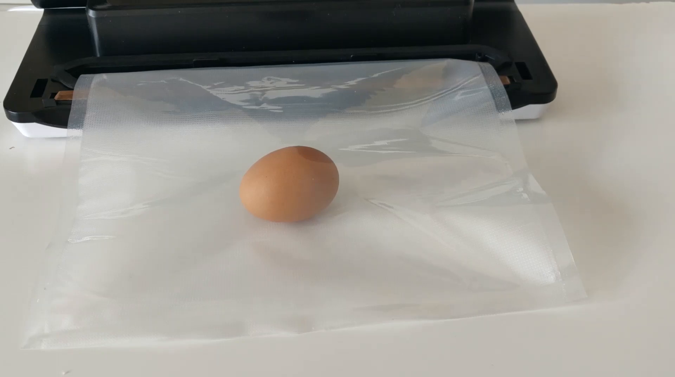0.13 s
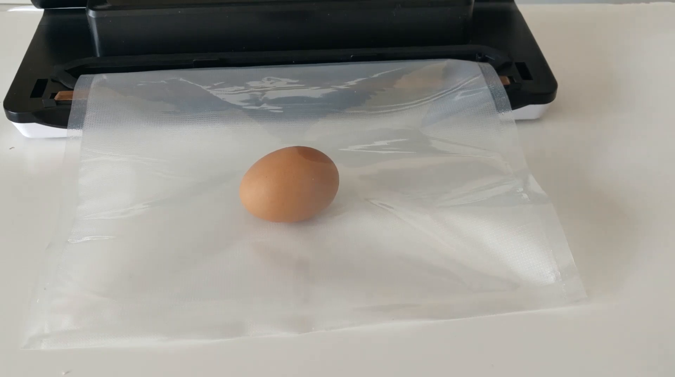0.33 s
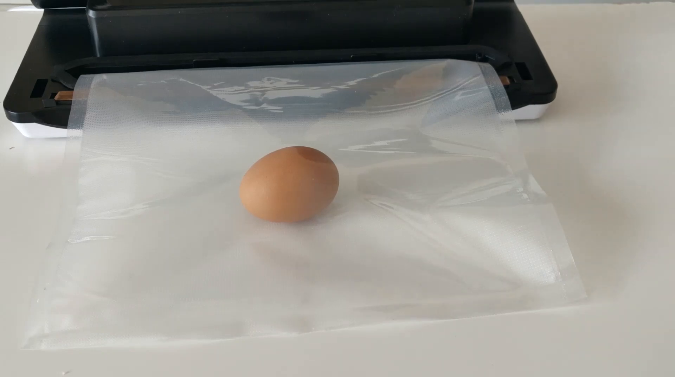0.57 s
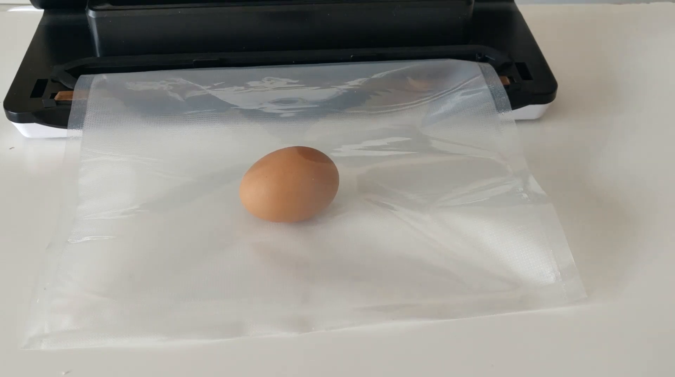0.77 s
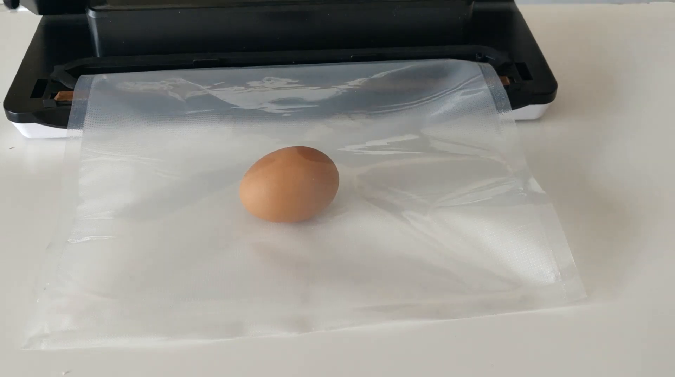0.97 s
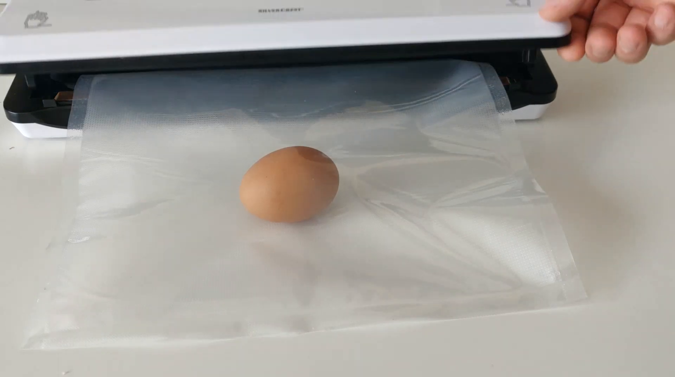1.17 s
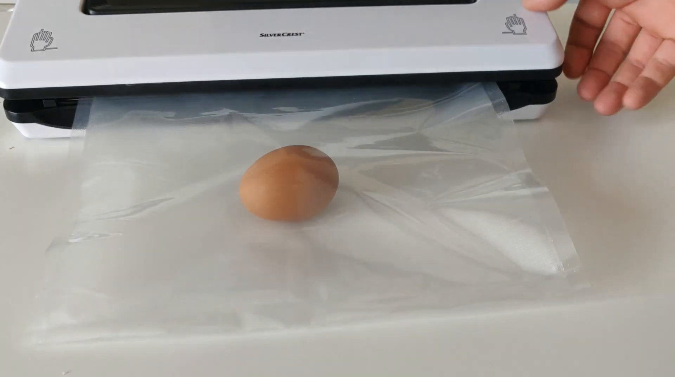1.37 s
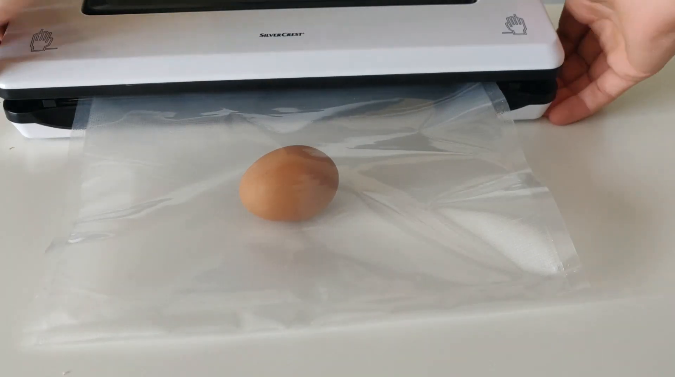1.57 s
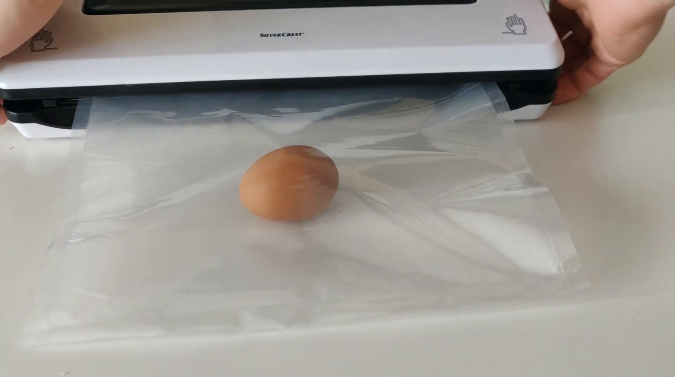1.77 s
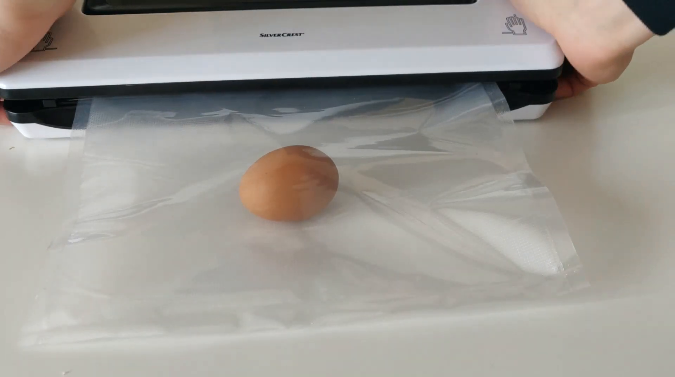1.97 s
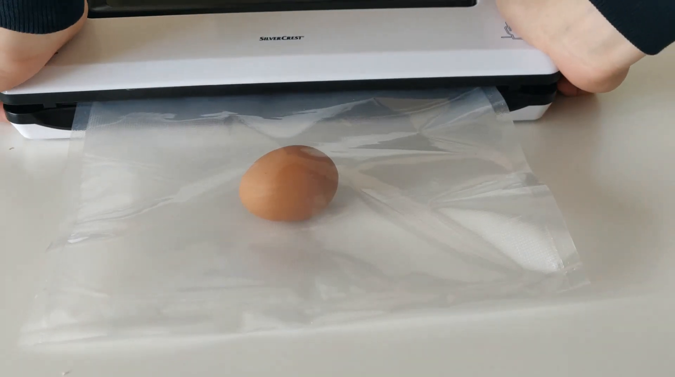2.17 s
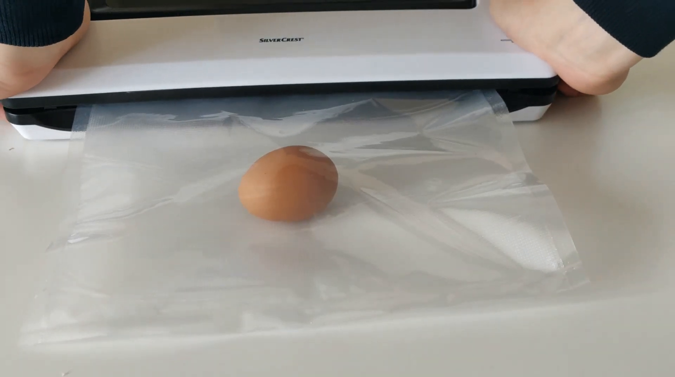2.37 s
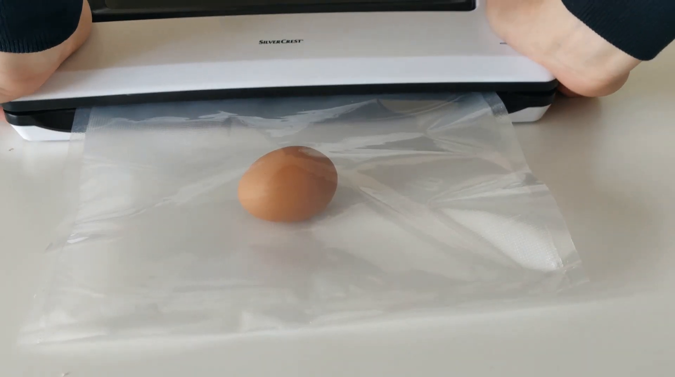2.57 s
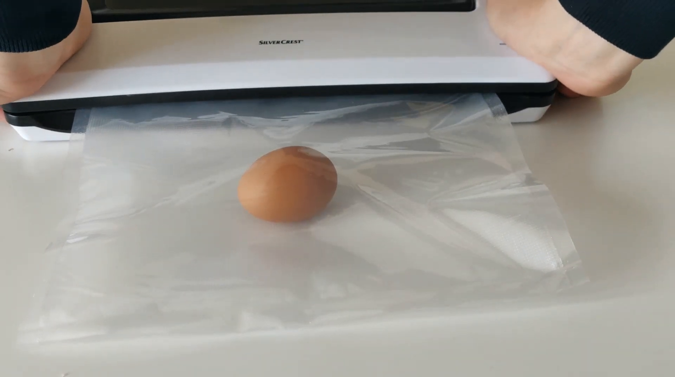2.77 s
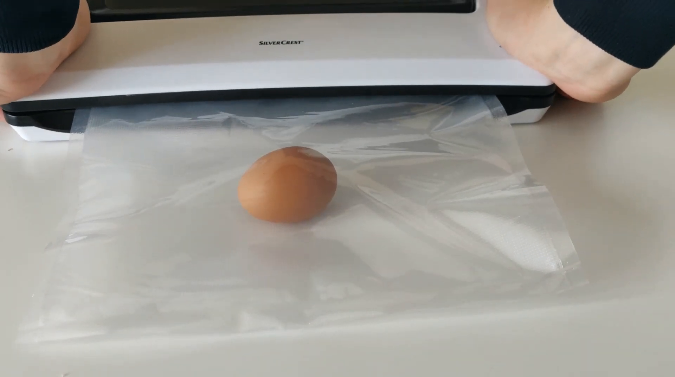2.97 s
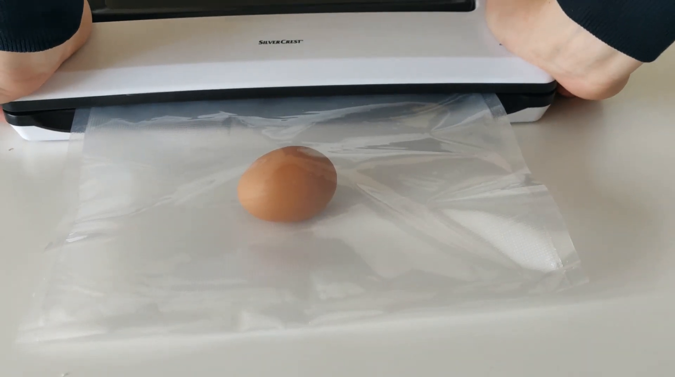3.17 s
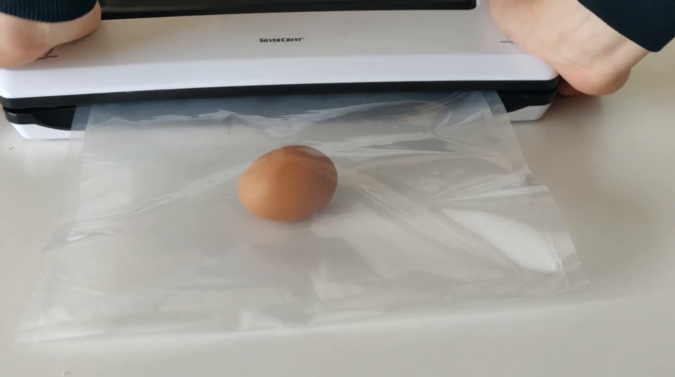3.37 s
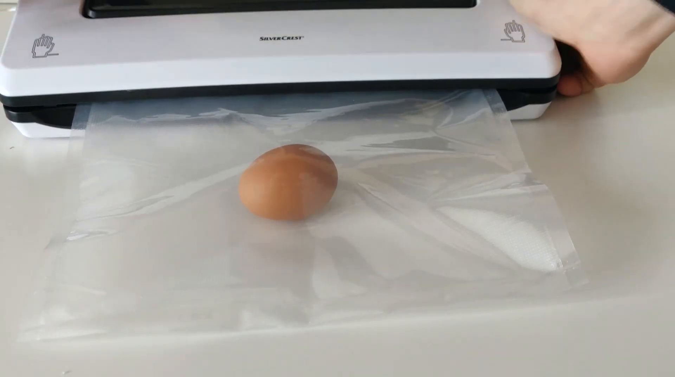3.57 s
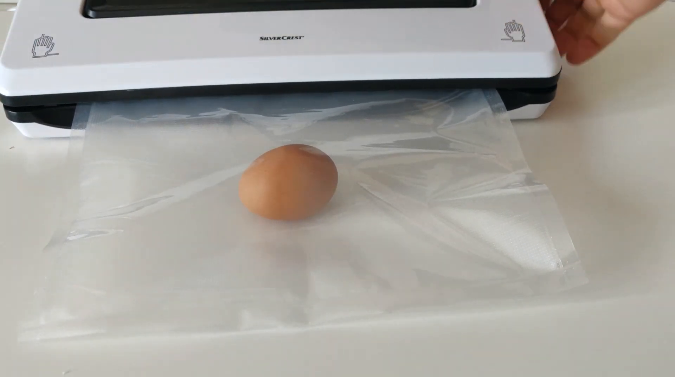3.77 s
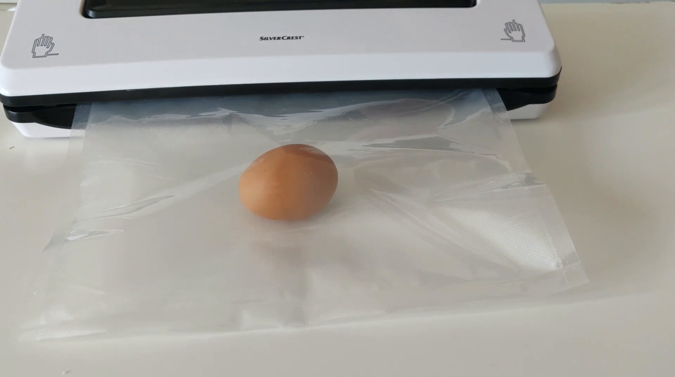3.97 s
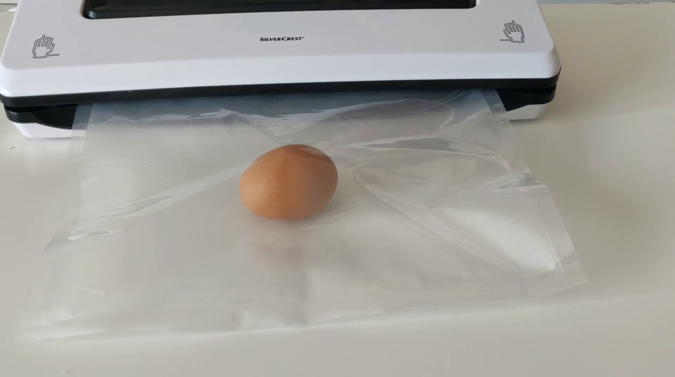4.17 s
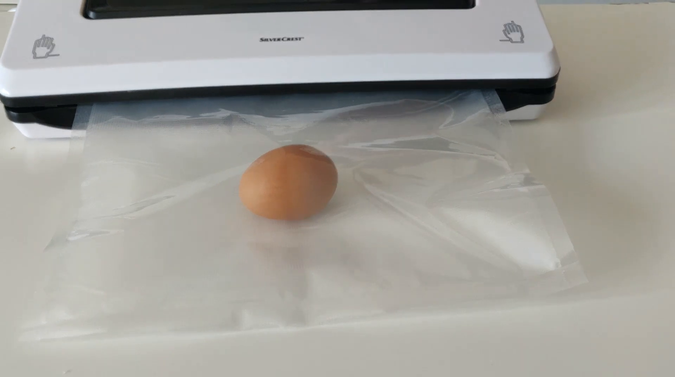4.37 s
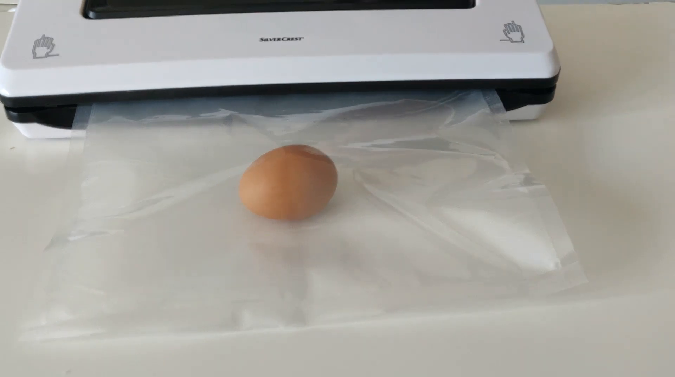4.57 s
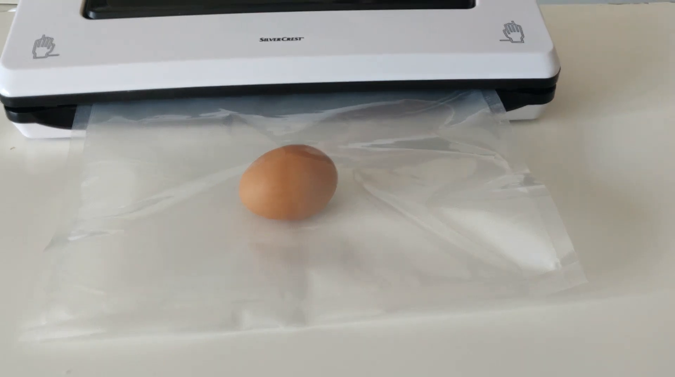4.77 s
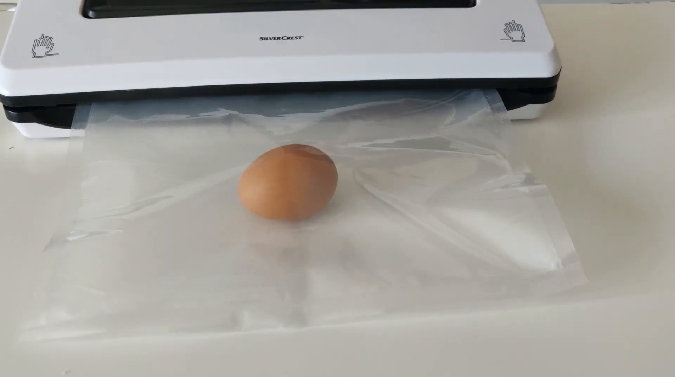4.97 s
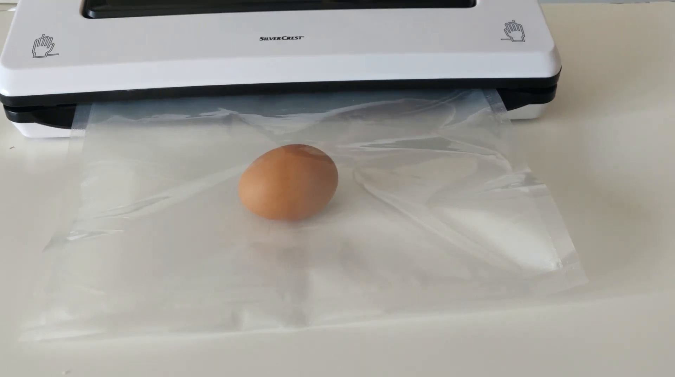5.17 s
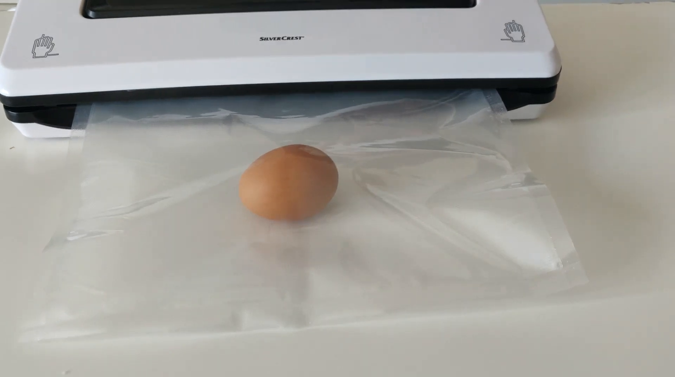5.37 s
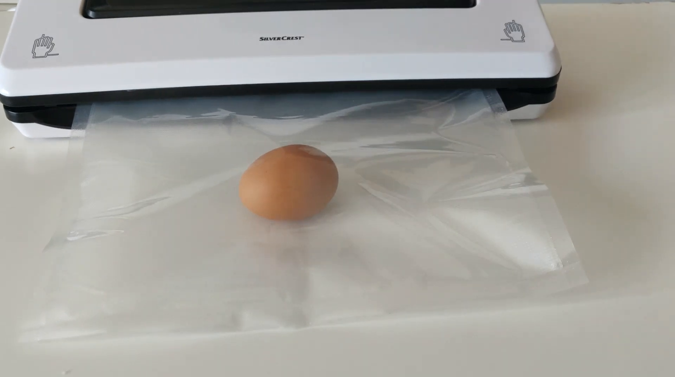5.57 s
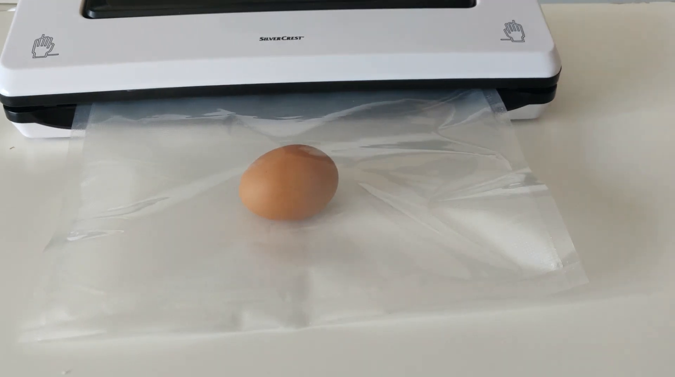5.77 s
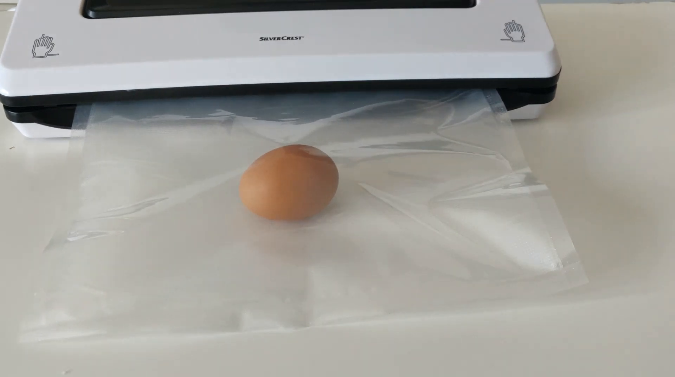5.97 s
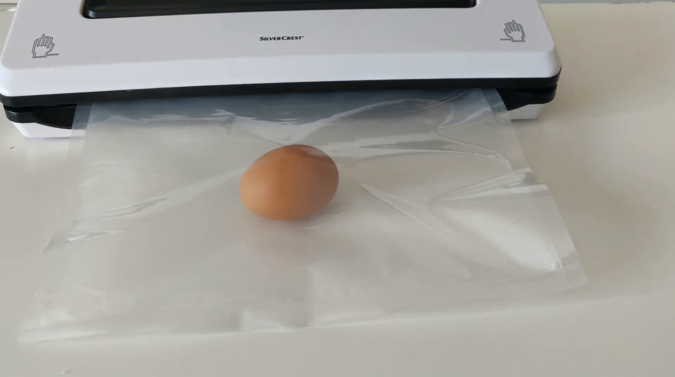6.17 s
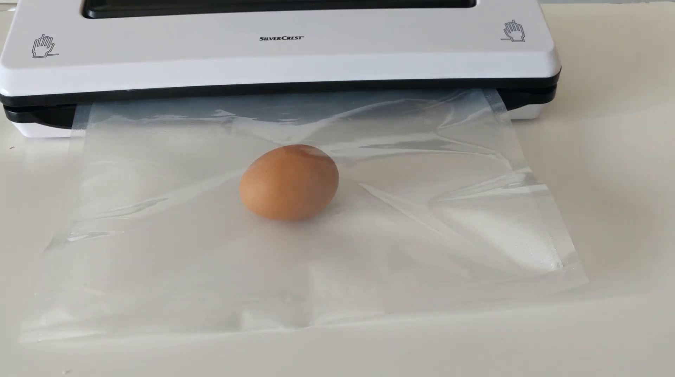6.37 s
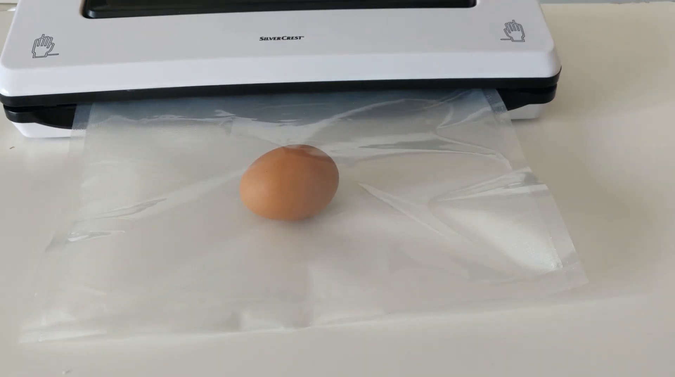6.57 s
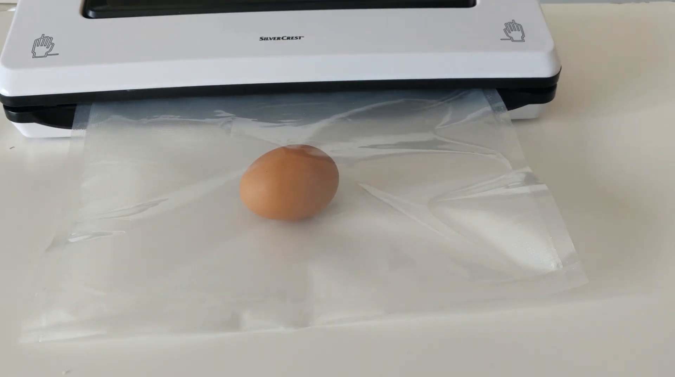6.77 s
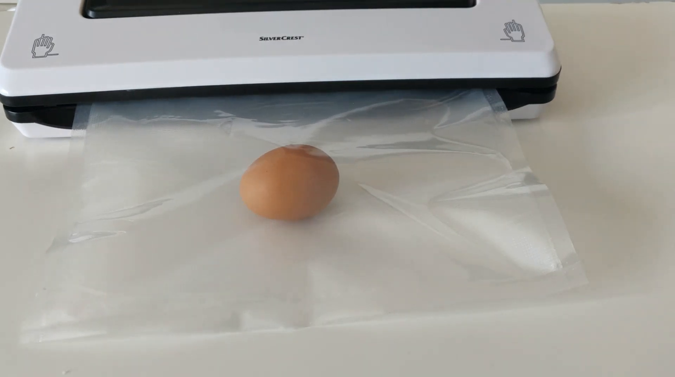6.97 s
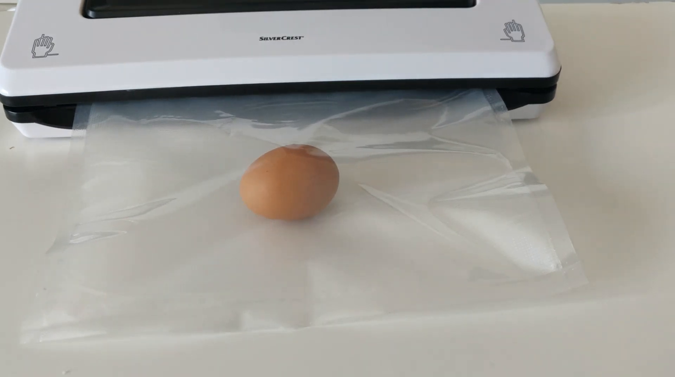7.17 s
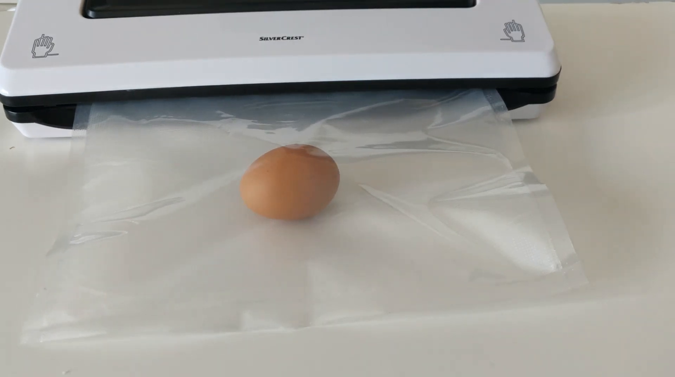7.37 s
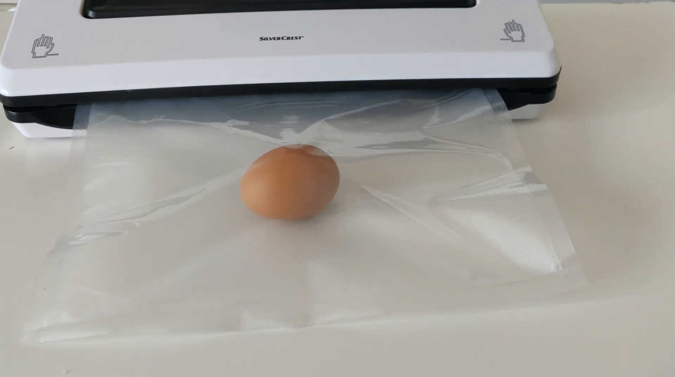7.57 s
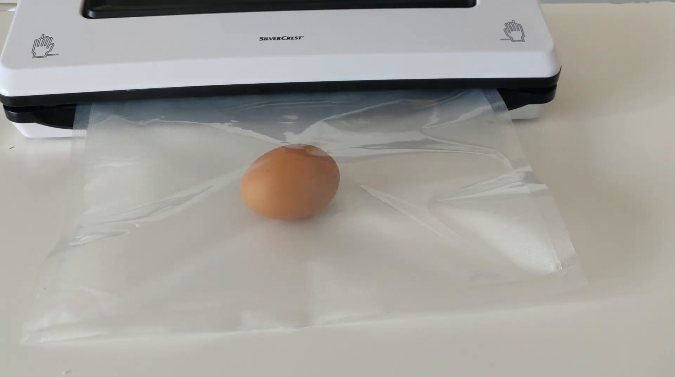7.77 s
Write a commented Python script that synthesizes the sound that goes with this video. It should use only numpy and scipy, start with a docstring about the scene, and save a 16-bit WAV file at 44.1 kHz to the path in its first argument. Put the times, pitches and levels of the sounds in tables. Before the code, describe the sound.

Close stereo microphones in a small kitchen. Soft rubbing and film rustle lead to hollow plastic knocks and a clattering lid landing. A low creak under pressure ends in two very loud, sharp latch snaps. Quiet room tone follows with a few faint touches, then a switch clicks and a piston pump starts with airy puffing, soon turning into a harder, buzzing hum.

```python
"""A lid is lowered amid rubbing hands and rustling film, pressed down, and latches with two loud snaps.
A switch clicks and a kitchen vacuum sealer's piston pump starts, puffing, then humming harder as the bag empties.
Blows are decaying housing modes with noise clatter and snaps; hands, film and air are coloured noise;
hum and whine are multiples of the shaft rate. A small room answers the blows, film ticks and switches,
and two close microphone ports add their own resonances."""
import sys
import numpy as np
from scipy import signal
from scipy.fft import rfft, irfft
from scipy.io import wavfile

SR = 44100
rng = np.random.default_rng(int(sys.argv[2]) if len(sys.argv) > 2 else 0)


def pcm_store(signal):
    """Save signal as 16-bit PCM."""
    levels = np.round(np.clip(np.atleast_2d(signal), -1, 1) * 32767)
    wavfile.write(sys.argv[1], SR, levels.astype(np.int16).T)


N = 344862
TIME = np.arange(N) / SR


def amp(db):
    """Decibels to gain."""
    return 10 ** (np.asarray(db) / 20)


def evened(x):
    """Scales to an rms of one."""
    return x / np.sqrt(np.mean(x ** 2) + 1e-20)


def attack_evened(x, size=441):
    """Scales so that the first hundredth of a second has an rms of one."""
    return evened(x) / np.sqrt(np.mean(evened(x)[:, :size] ** 2))


def read(points, hz):
    """Reads a spectrum on a log-frequency axis."""
    f, value = np.transpose(points)
    return np.interp(np.log(hz + 1), np.log(f + 1), value)


def curves(rows):
    """Each column of a timed table, sample by sample."""
    s, *columns = np.transpose(rows)
    return [np.interp(TIME, s, c) for c in columns]


def pan(side_db):
    """Left and right gains that differ by side_db."""
    return amp(np.array([[.5], [-.5]]) * side_db)


def colour(x, points, size=4096):
    """Causal minimum-phase filter with the given spectrum, made by folding its cepstrum."""
    log_gain = read(points, np.fft.rfftfreq(size, 1 / SR)) * np.log(10) / 20
    cepstrum = irfft(log_gain)
    cepstrum[1:size // 2] *= 2
    cepstrum[size // 2 + 1:] = 0
    response = irfft(np.exp(rfft(cepstrum)))
    return signal.oaconvolve(x, response[None], axes=1)[:, :x.shape[1]]


def noise(shared, size=N):
    """White noise at two ports, with a share of the power common to both."""
    left, right, common = rng.standard_normal((3, size))
    shared = np.clip(shared, 0, 1)
    return np.sqrt(1 - shared) * np.array([left, right]) + np.sqrt(shared) * common


def wander(rate_hz):
    """Slow chance with an rms of one."""
    spectrum = rfft(rng.standard_normal(N))
    return evened(irfft(spectrum * np.exp(-(np.fft.rfftfreq(N, 1 / SR) / rate_hz) ** 2), N))


def resonate(x, hz, width_hz):
    """A resonance of gain one that follows the curve hz."""
    turn = np.exp(2j * np.pi * np.cumsum(hz * np.ones(N)) / SR)
    r = np.exp(-np.pi * width_hz / SR)
    return 2 * (turn * signal.lfilter([1 - r], [1, -r], x / turn + 1e-18)).real


def add(mix, s, sound):
    """Mixes a sound in at time s."""
    part = mix[:, round(s * SR):][:, :sound.shape[1]]
    part += sound[:, :part.shape[1]]


def step(at_s, width_s):
    """A smooth rise from zero to one."""
    return .5 + .5 * np.tanh((TIME - at_s) / width_s / 2)


# colour of the rattling linkage: [f/Hz, level/dB]
RATTLE_TONE = [(1200, -82), (1850, 9), (2020, -7), (2300, 7.5), (2600, -4.5), (3600, -2.5), (5000, -3),
               (9000, -2.5), (16000, -35)]
# colour of the ticking brushes: [f/Hz, level/dB]
BRUSH_TONE = [(1500, -17), (4000, -2), (6000, 2), (10000, -5), (16000, -17)]
# colour of the exhaust air: [f/Hz, level/dB]
AIR_TONE = [(20, 4), (60, 17), (200, 17.5), (500, 13), (1000, 8), (1800, 10.5), (2800, -0.5), (4500, -8),
            (6500, -1), (9000, -1.5), (16000, -20)]
DRIVE_DB, LABOUR_DB = 1.25, 1.28  # gain on the driven parts; extra gain at full vacuum
ROCK_FREE_DB, ROCK_VACUUM_DB = -68, -43  # rocking before DRIVE_DB and LABOUR_DB, no vacuum and full vacuum


def pump(rattle_db=-51, rattle_t60=0.24, air_db=-43, puff_depth=0.046, free_rattle_db=-3,
         ticks_db=-53, ticks_per_s=520):
    """A piston pump: body hum, a ringing valve, rattling linkage, ticking brushes and puffs of exhaust air."""
    running, load, vacuum = effort()
    speed = shaft_speed(running, load)
    turns = np.cumsum(speed * (1 + 0.001175 * wander(24.8))) / SR

    from_stroke = (turns % 1 - .5) * SR / speed  # samples away from the nearest stroke
    strokes = np.sinc(from_stroke) * np.exp(-(from_stroke / 10) ** 2) * amp(1.1 * wander(48))
    t = np.arange(SR // 20) / SR
    linkage = noise(0, size=len(t)) * amp(-60 * t / rattle_t60)
    shaken = signal.oaconvolve(strokes[None], linkage, axes=1)[:, :N]
    rattle = evened(colour(shaken, RATTLE_TONE))
    rattle *= amp(rattle_db + free_rattle_db * (0.5 - load)) * pan(side_db=3.5)

    sparks = (rng.random(N) < ticks_per_s / SR) * rng.random(N)
    ticks = noise(0.13) * np.convolve(sparks, amp(-60 * t / 0.0088))[:N]
    ticks = amp(ticks_db) * evened(colour(ticks, BRUSH_TONE)) * pan(side_db=1)

    puffs = (1 + puff_depth * np.cos(4 * np.pi * turns)) * amp(1.5 * wander(80))  # two uneven puffs a turn
    air = amp(air_db) * evened(colour(noise(0.16) * puffs, AIR_TONE)) * pan(side_db=-2.0)

    # the machine rocks on its feet at half the shaft rate as the vacuum builds
    rock_db = ROCK_FREE_DB + (ROCK_VACUUM_DB - ROCK_FREE_DB) * vacuum
    rocking = amp(rock_db) * np.sqrt(2) * np.sin(np.pi * turns) * pan(side_db=-10)

    driven = hum(turns, load, vacuum) + rattle + ticks + air + rocking
    driven = amp(DRIVE_DB + LABOUR_DB * vacuum) * driven
    return running * (valve(turns, speed) + whine(turns, vacuum) + driven)


# the load steps up as the bag is sucked flat: [t/s, load gained]
COLLAPSES = [(5.394, 0.54), (5.495, 0.28)]
COLLAPSE_S = 0.0058  # how quickly each step takes hold
PUMP_ON_S, SPIN_UP_S = 5.008, 0.022  # start; time constant of the spin-up
# load on the piston, 0 = air flows freely .. 1 = pulling on a vacuum: a brief starting load, then nearly free
FREE_LOAD, START_LOAD, START_LOAD_S = 0.094, 0.99, 0.038
VACUUM_BUILD_S = 1.2  # time constant of the vacuum after the bag collapses


def effort():
    """The motor spins up and runs nearly free; the bag collapses, the piston takes load and the vacuum builds."""
    since_s = np.maximum(TIME - PUMP_ON_S, 0)
    running = 1 - np.exp(-since_s / SPIN_UP_S)
    load = FREE_LOAD + START_LOAD * np.exp(-since_s / START_LOAD_S)
    load = load + sum(gain * step(s, COLLAPSE_S) for s, gain in COLLAPSES)
    vacuum = 1 - np.exp(-np.maximum(TIME - COLLAPSES[-1][0], 0) / VACUUM_BUILD_S)
    return running, np.clip(load, 0, 1), vacuum


# turns per s: free speed, shortfall at the start, sag at full load; further sag in turns per s each second
FREE_SPEED, START_SHORTFALL, LOAD_SAG, SAG_PER_S = 76.3, 3, 0.45, 0.48


def shaft_speed(running, load):
    """Turns per second of the shaft, which slows under load and sags further as the bag empties."""
    pulling_s = np.maximum(TIME - COLLAPSES[-1][0], 0)
    return FREE_SPEED - START_SHORTFALL * (1 - running) - LOAD_SAG * load - SAG_PER_S * pulling_s


# hum with no load: [multiple of the shaft rate, level/dB relative to FREE_DB]
FREE_ORDERS = [(1, -43), (2, 1), (3, -13.5), (4, -13), (5, -19.5), (6, -29), (7, -29.5), (8, -21.5),
               (9, -32.5), (10, -28), (11, -26.5), (12, -36), (13, -47), (14, -29.5), (15, -44),
               (16, -30.5), (17, -31), (18, -49), (19, -37), (20, -27)]
# hum under full load: [multiple of the shaft rate, level/dB relative to LOADED_DB]
LOADED_ORDERS = [(1, -1), (2, -2.5), (3, -9.5), (4, -5), (5, -4), (6, -6.5), (7, -25), (8, -9), (9, -12.5),
                 (10, -24), (11, -18), (12, -25.5), (13, -20), (14, -22), (15, -13.5), (16, -19.5),
                 (17, -17.5), (18, -26), (19, -20), (20, -28)]
FREE_DB, LOADED_DB = -22, -33  # before the pump's drive gain
# colour change of the loaded hum from no vacuum to full vacuum: [f/Hz, level change/dB]
HARDENING = [(150, -1), (300, -2), (450, 5.5), (600, 4.5), (800, -13.5), (1000, 5), (1280, 5), (1450, -6)]
# where the pump body sits: [f/Hz, left minus right level/dB]
PUMP_SIDE = [(75, 2), (200, 2.5), (380, 5.5), (650, 10.5), (1290, -4)]


def hum(turns, load, vacuum, waver_db=0.75, spread=0.099, scatter=0.85):
    """Shaft orders of the pump body, roughly in step: two puffs a turn give way to a harder knock under load."""
    out = np.zeros((2, N))
    for (k, free_db), (_, loaded_db) in zip(FREE_ORDERS, LOADED_ORDERS):
        nominal_hz = 75 * k  # where the order reads its colour and side
        harder_db = read(HARDENING, nominal_hz) * (vacuum - .5)
        free_part = (1 - load) * amp(FREE_DB + free_db)
        loaded_part = load * amp(LOADED_DB + loaded_db + harder_db)
        level = (free_part + loaded_part) * amp(waver_db * wander(10)) * pan(read(PUMP_SIDE, nominal_hz))
        apart = np.array([[.5], [-.5]]) * spread * k * rng.choice([-1, 1])
        phase = scatter * rng.standard_normal() + apart
        out -= np.sqrt(2) * level * np.cos(2 * np.pi * k * turns + phase)
    return out


# ring of the valve, before VALVE_GAIN_DB: [t/s, level/dB]
VALVE_LEVEL = [(5.04, -33.5), (5.09, -33), (5.52, -32), (6.36, -33.5), (6.53, -35.5), (7.29, -39.5),
               (7.82, -33)]
VALVE_HZ, VALVE_GAIN_DB = 1702.3, -2.5


def valve(turns, speed, ring_s=0.0099):
    """Once a turn the valve ring swells and fades."""
    level_db, = curves(VALVE_LEVEL)
    since_s = turns % 1 / speed
    swell = np.sin(np.pi * np.minimum(since_s / ring_s, 1)) ** 2 * amp(.5 * wander(40))
    ring = swell * np.sin(2 * np.pi * VALVE_HZ * since_s + np.array([[0], [1]]))
    return amp(VALVE_GAIN_DB + level_db) * evened(ring) * pan(side_db=8.5)


# whine of the motor: [multiple of the shaft rate, relative level/dB]
WHINE_ORDERS = [(24, 0), (26, -22.5), (27, -16), (29, -15.5), (30, -23.5), (31, -26), (37, -29.5),
                (47, -24.5), (49, -26.5), (58, -29)]
WHINE_FREE_DB, WHINE_VACUUM_DB = -48, -38.5  # with no vacuum and with full vacuum


def whine(turns, vacuum, waver_db=1.8):
    """High shaft orders of the motor swell as it labours against the vacuum."""
    out = np.zeros((2, N))
    for k, db in WHINE_ORDERS:
        level = np.sqrt(2) * amp(db + waver_db * wander(6.2))
        out += level * np.cos(2 * np.pi * k * turns + np.array([[0], [1]]))
    return amp(WHINE_FREE_DB + (WHINE_VACUUM_DB - WHINE_FREE_DB) * vacuum) * out * pan(side_db=17.0)


# blows on the plastic housing, snaps before a 6.5 dB cut:
# [t/s, low thud level/dB, mid clack level/dB, high snap level/dB]
BLOWS = [(0.309, -43.5, -74, -71), (0.7425, -38, -46, -75), (0.826, -32.5, -62, -70),
         (0.862, -41, -51, -68), (0.879, -39, -40.5, -63), (0.971, -31, -35.5, -60), (0.994, -24, -33, -60),
         (1.307, -56, -42, -32), (1.329, -48, -41, -27.5), (1.335, -23.5, -28.5, -30),
         (1.345, -20, -34, -24), (1.349, -22, -27, -43), (1.377, -23, -39, -53), (1.436, -34, -40.5, -61),
         (1.525, -44, -46, -56), (1.623, -40, -43, -49), (1.671, -39.5, -44.5, -54), (1.697, -45, -50, -70),
         (1.862, -49, -44, -50), (2.157, -41.5, -57, -49), (2.179, -61, -42, -54), (2.204, -54, -55, -37.5),
         (2.657, -24.5, -29, -46.5), (2.7221, -24, -20, -13), (2.737, -47, -26.5, -43),
         (2.838, -40, -42, -69.5), (2.9677, -25, -25, -16), (2.971, -26.5, -19.5, -13.5),
         (2.986, -53, -43, -29), (3.37, -56, -50, -48), (3.745, -53, -52.5, -65), (5.152, -34, -34, -49)]
# modes of the housing and lid, before each blow's detuning: [f/Hz, level/dB, t60/s]
HOUSING_MODES = [(169.8, -4.5, 0.19), (239.6, 2.5, 0.093), (297, 4.5, 0.051), (418, 2.5, 0.067),
                 (471, 2.5, 0.047), (657.4, 5.5, 0.045), (815, 1, 0.065), (935, 4.5, 0.046),
                 (1172, -3, 0.067), (1489, -1.5, 0.054), (1960, -12, 0.054), (2360, -19, 0.067)]
THUD_BELOW_HZ = 600  # modes below belong to the thud, the rest to the clack
# colour of the loose plastic: [f/Hz, level/dB]
CLATTER_TONE = [(150, -58), (400, -4.5), (800, 4.5), (1300, -8), (2000, -12.5), (3200, -23), (8000, -37.5)]
# colour of the hard edges: [f/Hz, level/dB]
SNAP_TONE = [(300, -37), (900, 10.5), (2000, 9), (3500, -2.5), (6000, 2), (9000, 1.5), (16000, -22.5)]


def blows(detune=0.0442, spread=0.67, snap_t60=0.031, buzz_t60=0.079, buzz_db=-13,
          clatter_db=-2, clatter_t60=0.036, rise_s=0.00041):
    """Each blow rings the housing; loose plastic clatters and hard edges add a snap and a short buzz."""
    out, t = np.zeros((2, N)), np.arange(SR // 3) / SR
    hz, db, t60 = np.transpose(HOUSING_MODES)[:, :, None]
    low = hz[:, 0] < THUD_BELOW_HZ
    contact = 1 - np.exp(-t / rise_s)
    for s, thud_db, clack_db, snap_db in BLOWS:
        shift, sign, lag = rng.standard_normal((3, len(hz), 1))
        turn = 2 * np.pi * hz * (1 + detune * shift) * t
        apart = spread * lag * hz / 1000  # higher modes reach the two ports out of step
        decay = np.sign(sign) * amp(db - 60 * t / t60) * contact
        rings = decay * np.sin([turn + apart, turn - apart])
        thud = rings[:, low].sum(1)
        clatter = colour(noise(0.5, size=len(t)) * amp(-60 * t / clatter_t60) * contact, CLATTER_TONE)
        clack = attack_evened(rings[:, ~low].sum(1)) + amp(clatter_db) * attack_evened(clatter)
        snap_decay = amp(-60 * t / snap_t60) + amp(buzz_db - 60 * t / buzz_t60)
        snap = colour(noise(0.16, size=len(t)) * snap_decay * contact, SNAP_TONE)
        add(out, s, amp(thud_db) * attack_evened(thud))
        add(out, s, amp(clack_db) * attack_evened(clack))
        add(out, s, amp(snap_db - 6.5) * attack_evened(snap))
    return out * pan(side_db=3.0)


# lid, hands and latches shake the table: [t/s, level/dB, f/Hz]
THUMPS = [(0.189, -45, 34.2), (0.28, -44, 36), (1.338, -38, 86), (1.345, -37, 47.7), (1.386, -37, 89.5),
          (1.68, -42.5, 90), (2.156, -52.5, 95), (2.725, -43, 116), (2.97, -31, 139)]


def thumps(cycles=13, rise_s=0.0089):
    """The table top swings under the machine, dying away by 60 dB in a few cycles."""
    out, t = np.zeros((2, N)), np.arange(SR // 2) / SR
    for s, db, hz in THUMPS:
        swing = np.sin(2 * np.pi * hz * t) * amp(-60 * t * hz / cycles) * (1 - np.exp(-t / rise_s))
        add(out, s, amp(db) * attack_evened(swing[None]) * pan(side_db=6.5))
    return out


# clicks inside the case: [t/s, level/dB, treble level/dB]
SWITCH_CLICKS = [(4.9573, -27.5, 1), (5.152, -28.5, -6.5)]
# colour of a click: [f/Hz, level/dB]
SWITCH_TONE = [(150, -4), (500, 17.5), (1000, -8), (1500, 3), (2200, 6.5), (3300, -4.5), (5000, -6),
               (6500, -3), (8000, -17), (10000, -27), (16000, -26)]


def switch(t60=0.019, buzz_t60=0.091, buzz_db=-15, treble_hz=2500):
    """Switches click inside the case as short noise with a fainter buzz, each with its own treble level."""
    out, t = np.zeros((2, N)), np.arange(SR // 8) / SR
    for s, db, treble_db in SWITCH_CLICKS:
        decay = amp(-60 * t / t60) + amp(buzz_db - 60 * t / buzz_t60)
        click = colour(noise(0.55, size=len(t)) * decay, SWITCH_TONE)
        click = colour(click, [(treble_hz, 0), (2 * treble_hz, treble_db)])
        add(out, s, amp(db) * attack_evened(click))
    return out * pan(side_db=4)


# strokes of the hands over lid and bag, before the rub and film gains:
# [start t/s, length/s, rubbing level/dB, film rustle level/dB]
STROKES = [(0.133, 0.83, -56.5, -57.5), (0.775, 0.38, -48.5, -68), (1.292, 0.079, -45.5, -41),
           (1.404, 0.49, -44, -53.5), (1.724, 0.12, -44, -44.5), (1.796, 0.22, -43, -55),
           (3.336, 0.19, -50, -48.5), (3.74, 0.1, -61, -62), (4.297, 0.12, -69, -54)]
# between strokes the hands rest on the machine, until they let go; levels before the same gains
REST_RUB_DB, REST_FILM_DB, LET_GO_S, LET_GO_FADE_S = -59, -64, 4.77, 0.21
# colour of skin on the lid: [f/Hz, level/dB]
RUB_TONE = [(60, -23), (160, 11.5), (400, 4), (800, 2.5), (1600, -20.5), (3000, -26), (8000, -48)]
# colour of the rustling film: [f/Hz, level/dB]
FILM_TONE = [(400, -20), (1500, 9), (3000, -2), (6000, -2.5), (10000, -5), (16000, -3)]


def hands(rub_db=-2, film_db=-5, uneven_db=3.0, grain_db=3):
    """Skin rubs the lid unevenly while the film crackles in fine grains."""
    resting = 1 - step(LET_GO_S, LET_GO_FADE_S)
    rubbing, rustling = amp(REST_RUB_DB) * resting, amp(REST_FILM_DB) * resting
    for start_s, length_s, stroke_rub_db, stroke_film_db in STROKES:
        pressure = arch(start_s, length_s)
        rubbing = np.hypot(rubbing, amp(stroke_rub_db) * pressure)
        rustling = np.hypot(rustling, amp(stroke_film_db) * pressure)
    skin = evened(colour(noise(0.68) * amp(uneven_db * wander(33)), RUB_TONE))
    grains = evened(colour(noise(.1) * amp(grain_db * wander(400)), FILM_TONE))
    rub = amp(rub_db) * rubbing * skin
    film = amp(film_db) * rustling * grains
    return (rub + film) * pan(side_db=2.5)


STROKE_PEAK_AT = 0.28  # share of a movement's length at which it is strongest


def arch(start_s, length_s):
    """The pressure of one hand movement: a quick swell and a slower release."""
    peak_s = start_s + np.clip(STROKE_PEAK_AT, .05, .95) * length_s
    return np.sin(np.pi * np.interp(TIME, [start_s, peak_s, start_s + length_s], [0, .5, 1]))


# single snaps of the stiff film: [t/s, level/dB, centre f/Hz]
CRACKLES = [(0.512, -57.5, 6360), (2.206, -44.5, 5200), (2.283, -61, 5200), (4.512, -51.5, 8000)]


def crackles(t60=0.0015, low_slope_db=14, high_slope_db=12):
    """A crease of the film flips over with a tiny bright tick; slopes are in dB per octave."""
    out, t = np.zeros((2, N)), np.arange(SR // 40) / SR
    for s, db, hz in CRACKLES:
        tone = [(hz / 8, -3 * low_slope_db), (hz, 0), (hz * 4, -2 * high_slope_db)]
        tick = colour(noise(0.3, size=len(t)) * amp(-60 * t / t60), tone)
        add(out, s, amp(db) * attack_evened(tick))
    return out * pan(side_db=3.0)


# the lid squeezes its foam seal with a low creak
SQUEEZE_AT_S, SQUEEZE_S, SQUEEZE_DB = 1.95, 0.96, -53.5


def squeeze(creak_hz=230, width_hz=300, uneven_db=3, groan_hz=340, groan_width_hz=25, groan_db=-7):
    """The seal gives way in small uneven slips and groans faintly where the pressure peaks."""
    pressure = arch(SQUEEZE_AT_S, SQUEEZE_S)
    slips = noise(0.74) * amp(uneven_db * wander(50))
    creak = evened(resonate(resonate(slips, creak_hz, width_hz), creak_hz, width_hz))
    groan = amp(groan_db) * pressure ** 2 * evened(resonate(slips, groan_hz, groan_width_hz))
    return amp(SQUEEZE_DB) * pressure * (creak + groan) * pan(side_db=1.5)


# how long the kitchen rings in each band: [f/Hz, t60/s]
ROOM_T60 = [(150, 0.34), (500, 0.23), (2000, 0.26), (6000, 0.24), (15000, 0.13)]


def room(x, wet_db=-7, build_s=0.0048):
    """A small kitchen: sparse reflections that die away by band."""
    size = SR // 2
    build = 1 - np.exp(-(np.arange(size) / SR / build_s) ** 2)
    taps = rng.choice([-1., 1.], (2, size)) * (rng.random((2, size)) < .08) * build
    hz, t, bands = signal.stft(taps, SR, nperseg=256)
    decay = amp(-60 * t / read(ROOM_T60, hz)[:, None])
    tail = signal.istft(bands * decay, SR, nperseg=256)[1]
    return x + amp(wet_db) * signal.fftconvolve(x, tail / np.linalg.norm(tail[0]), axes=1)[:, :N]


# colour of the room tone: [f/Hz, level/dB]
ROOM_TONE = [(15, -14.5), (30, -8), (60, -16), (90, 3), (160, -6.5), (300, -8.5), (800, -12), (2000, -19),
             (5000, -29), (16000, -28)]


def background(tone_db=-60, drone_db=-51, drone_hz=43, drone_width_hz=16):
    """Quiet room tone over a deep throbbing drone, which is noise through two narrow resonances."""
    drone = resonate(resonate(noise(0.92), drone_hz, drone_width_hz), drone_hz, drone_width_hz)
    tone = evened(colour(noise(0.15), ROOM_TONE))
    return (amp(tone_db) * tone + amp(drone_db) * evened(drone)) * pan(side_db=2.0)


def scene():
    """Lid, hands and pump over the background; only blows, film ticks and switches excite the room."""
    return room(blows() + crackles() + switch()) + thumps() + squeeze() + hands() + pump() + background()


# resonance of the left microphone port: [f/Hz, level/dB]
LEFT_PORT = [(2500, 1), (4000, 4.5), (5200, 5.5), (6300, 14.5), (7200, 7.5), (8200, -1), (9500, -10.5),
             (11000, -9.5), (13000, -11), (15500, -0.5)]
# resonance of the right microphone port: [f/Hz, level/dB]
RIGHT_PORT = [(2500, 1), (4000, 5.5), (6300, 2.5), (8000, 3), (9100, 10), (9800, 5), (10800, -20.5),
              (12500, -4.5), (15500, 3.5)]
EDGE_HZ = 15900  # upper band limit


def record(dry, hiss_db=-79):
    """Port resonances, microphone hiss, soft overload on the loudest snaps and the band limit."""
    ports = np.vstack([colour(dry[:1], LEFT_PORT), colour(dry[1:], RIGHT_PORT)])
    ports = ports + amp(hiss_db) * noise(0)
    ports = ports / (1 + (ports / .9) ** 6) ** (1 / 6)  # bends towards a ceiling of 0.9
    edge = signal.firwin(255, EDGE_HZ, window=("kaiser", 9), fs=SR)
    return signal.oaconvolve(ports, edge[None], "same")


dry = scene()
out = record(dry)
pcm_store(out)
```